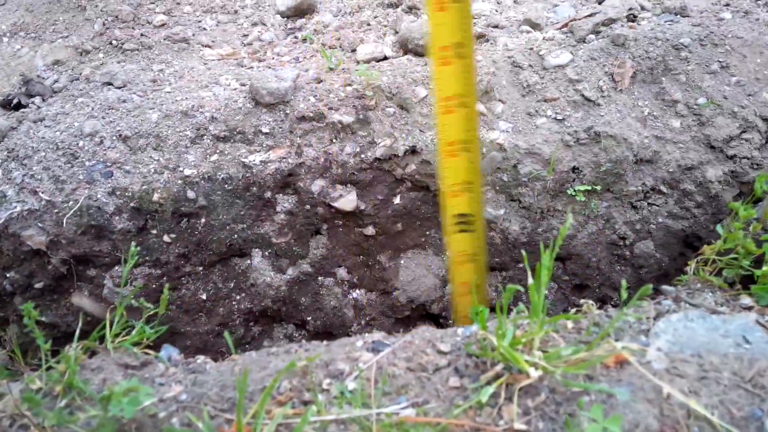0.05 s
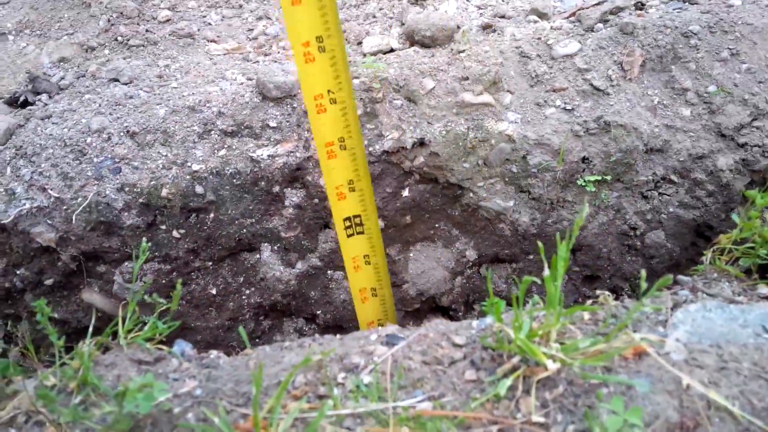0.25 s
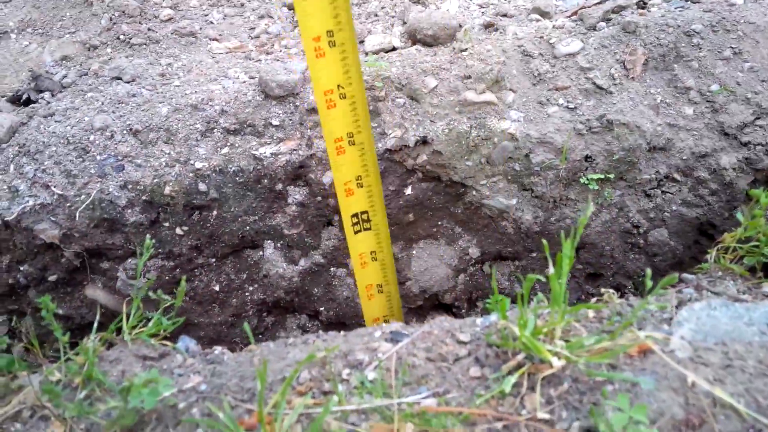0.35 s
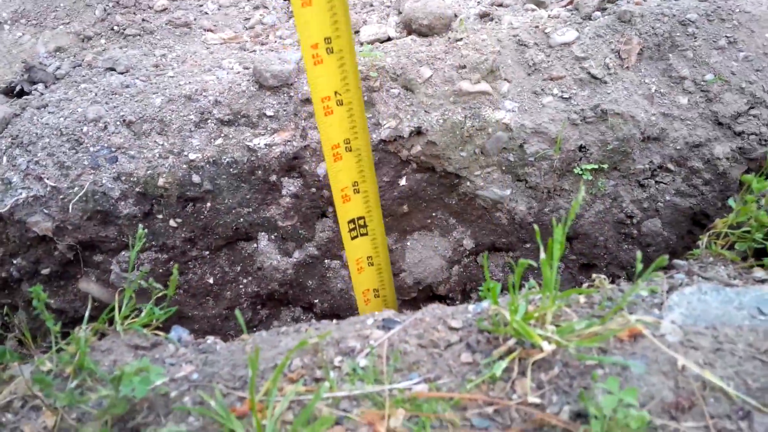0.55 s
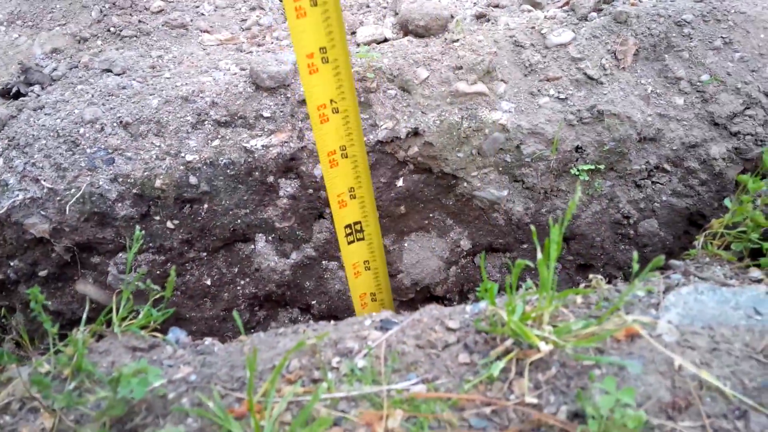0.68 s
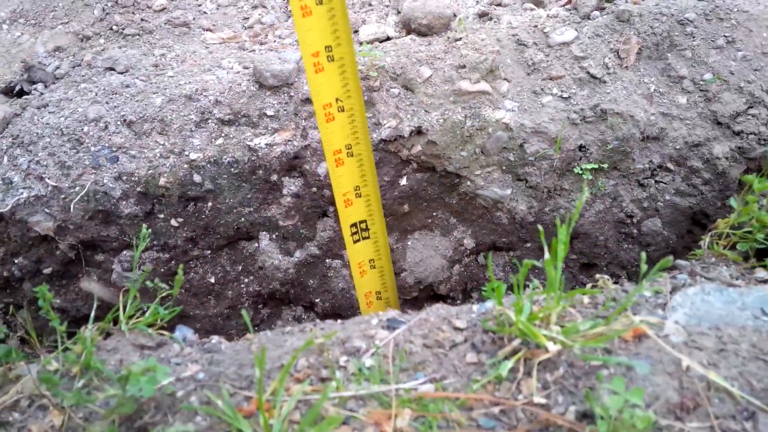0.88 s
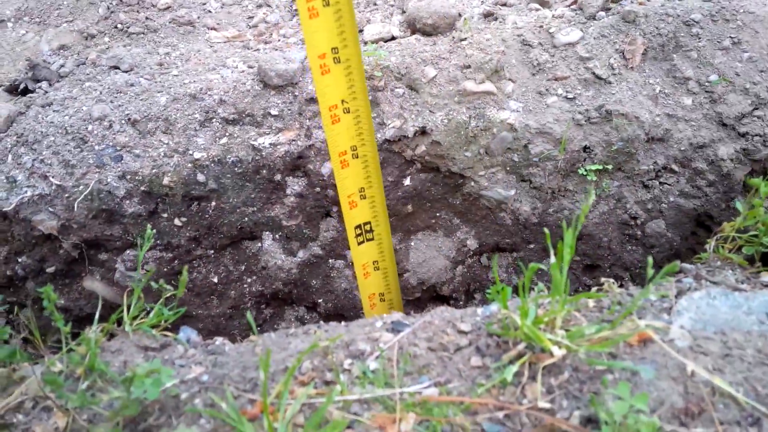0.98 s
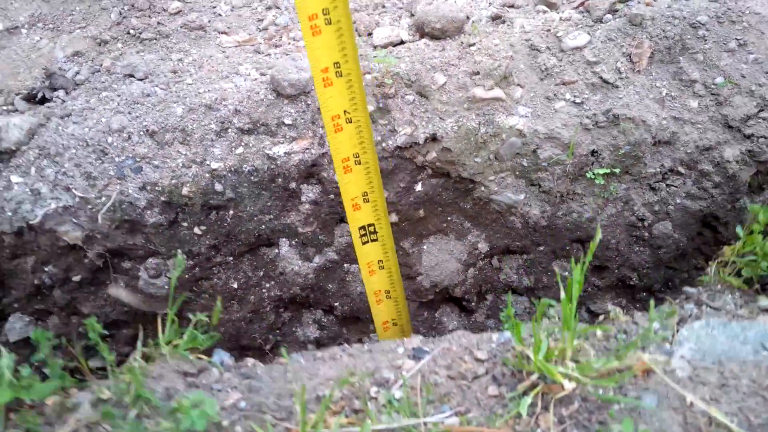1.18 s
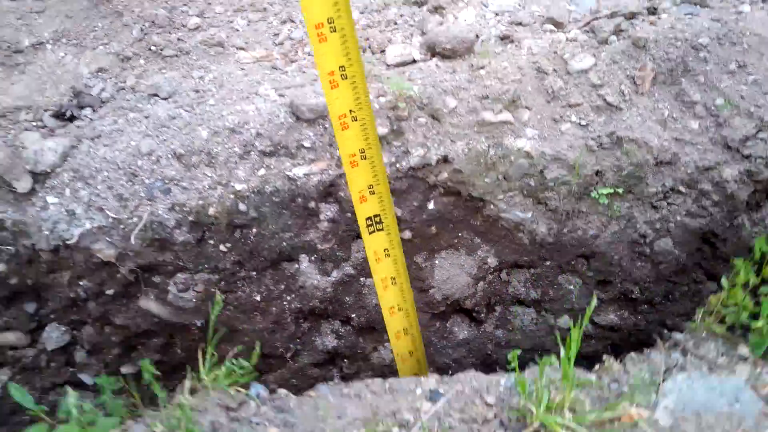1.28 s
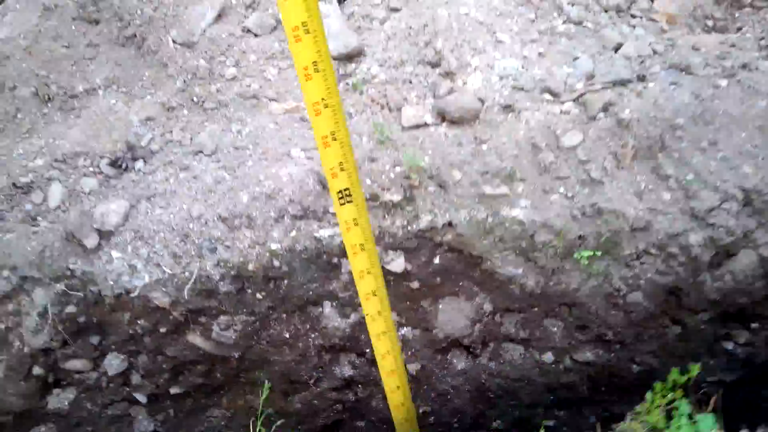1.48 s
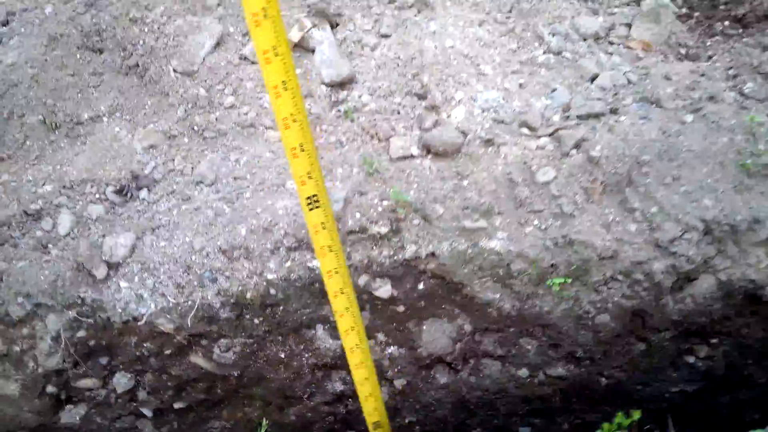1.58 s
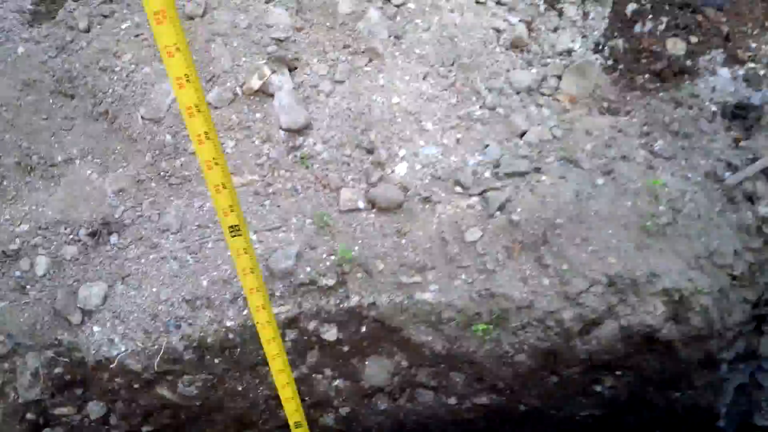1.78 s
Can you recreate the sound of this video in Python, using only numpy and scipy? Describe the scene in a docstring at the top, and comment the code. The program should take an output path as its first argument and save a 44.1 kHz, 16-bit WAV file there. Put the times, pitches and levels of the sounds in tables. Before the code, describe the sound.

A metal tape measure, close and slightly left, ticks against stones and buckles with a loud, bright clatter at about 0.2 seconds. Lighter scrapes follow, with a sharp click near 0.6. It rests from 0.8 to 1.2, when very faint distant chirps come through. Then it clicks and scrapes over gritty soil, ringing slightly and thinning out by 1.8. A low hum, handling rumble and soft outdoor air continue throughout.

```python
"""Tape measure in a dirt trench.

Close to the microphone and a little to the left, a steel tape measure is pushed down into a trench.
Its thin blade buckles with a loud clatter, ticks against stones, rests, then scrapes along the edge;
the hits and scrapes set the steel ringing. A low handling rumble at the microphone swells now and
then. Behind are a steady mains hum, a wash of open air and a faint far-off chirping."""
import sys
import numpy as np
from scipy import signal
from scipy.fft import rfft, irfft, next_fast_len
from scipy.io import wavfile
from scipy.ndimage import map_coordinates

SR = 44100
rng = np.random.default_rng(int(sys.argv[2]) if len(sys.argv) > 2 else 0)


def bounce(signal):
    """Save signal as a 16-bit WAV file at the path given by the first command-line argument."""
    frames = np.transpose(np.atleast_2d(signal))
    limited = np.clip(frames, -1, 1)
    pcm = np.round(limited * 32767).astype(np.int16)
    wavfile.write(sys.argv[1], SR, pcm)


N = 81585

# Mains hum. Each row: frequency in Hz, level in dB.
HUM_TONES = [(120, -44.5), (241, -70)]
# Spectra of the handling rumble, the drone around the hum, the open air, the blade's steel, a light
# tick's loss of lows, and rubbed soil. Each row: frequency in Hz, relative level in dB.
HANDLING_SPECTRUM = [(20, -3.5), (35, 0.5), (52, 4.5), (75, 6), (100, -8.5), (170, -29), (400, -67)]
DRONE_SPECTRUM = [(50, -16), (110, 1.5), (170, -1), (250, -4.5), (400, -11), (700, -21), (1500, -55)]
AIR_SPECTRUM = [(100, -19.5), (400, -4.5), (850, 0.5), (1400, -3.5), (2200, -12), (3800, -22),
                (5500, -28.5), (9000, -35.5), (15000, -50.5)]
STEEL_SPECTRUM = [(200, -25), (600, -32), (1000, -17.5), (1500, -22.5), (2200, -12), (3000, -7),
                  (4000, -0.5), (5500, -2), (7500, 2.5), (10000, 1.5), (13000, 0), (15800, -4.5)]
TICK_LOW_CUT = [(1200, -17), (3000, 3)]
SOIL_SPECTRUM = [(250, -12), (600, -1), (1200, -8), (1650, -2.5), (1780, 7.5), (1950, -7), (3300, -2),
                 (5000, -14), (9000, -34.5)]
# How handling rumble, air and soil rub rise and fall. Each row: time in seconds, level in dB.
HANDLING_LEVEL = [(0, -52.5), (0.4, -51), (1.0, -54.5), (1.25, -50), (1.6, -49.5), (1.85, -55.5)]
AIR_LEVEL = [(0, -59.5), (0.6, -61.5), (1.1, -61.5), (1.85, -59)]
SOIL_LEVEL = [(1.25, -76), (1.38, -72), (1.5, -53), (1.65, -56), (1.85, -57)]
# Tilts of a contact's spectrum. Each row: frequency in Hz, dB per unit of body or treble amount.
BODY_TILT = [(1200, 5.5), (2800, 3), (4800, 2.5), (7000, -0.5)]
TREBLE_TILT = [(9000, 3), (13000, 3.5)]
# The blade sliding on grit. Each row: start and length in seconds, mid-stroke level in dB,
# change along the stroke in dB, body amount, treble amount, singing pitch in Hz.
GRIT_SCRAPES = [(0.035, 0.014, -41.5, 14, 1.5, 12, 7600), (0.05, 0.037, -54.5, -2, 5.5, 11, 6360),
                (0.142, 0.024, -54.5, 6, 4, 26, 12400), (0.16, 0.029, -45.5, 8, 4, 5, 6300),
                (0.184, 0.021, -35, -9, 2, -5, 5400), (0.203, 0.053, -21.3, -1, 1.24, 4, 5500),
                (0.269, 0.019, -36.5, -9, 2, 0, 3730), (0.289, 0.1, -45.5, -15.5, 0.5, 3, 6560),
                (0.416, 0.038, -54, 10, -1, 9, 6100), (0.454, 0.023, -45, 5, 1, -3, 6950),
                (0.484, 0.13, -55, 16, -1, -9, 10900), (0.583, 0.063, -46.5, 12, 2.5, 7, 9600),
                (0.649, 0.074, -51.5, -6, 1, 7, 9400), (1.209, 0.048, -55.5, 2.5, 2, -3, 4030),
                (1.27, 0.0088, -45, 16, -0.5, 0, 6900), (1.282, 0.12, -46, -8, -0.5, 8, 7800),
                (1.334, 0.035, -39.5, -7, -2, -19, 6400), (1.37, 0.046, -42, -12, -1, -1, 6800),
                (1.408, 0.054, -38, -4.5, 1, 7, 6800), (1.461, 0.057, -36, -3.5, -0.5, -2, 6440),
                (1.526, 0.076, -37, -0.5, -0.5, 2, 15000), (1.614, 0.055, -52, -1, 2.5, -2, 5360),
                (1.675, 0.099, -59.5, -12, 3.5, -31, 6070), (1.791, 0.034, -54, 13, -0.5, -4, 7750)]
# The blade striking stones. Each row: start in seconds, level in dB, 60 dB decay time in seconds,
# body amount, treble amount, ping pitch in Hz.
STONE_TICKS = [(0.0448, -33.5, 0.02, -1, 0, 7300), (0.134, -49, 0.013, -4, 16, 12670),
               (0.1673, -32, 0.03, -4, 7, 6300), (0.183, -24.5, 0.052, 1.5, -3, 8700),
               (0.2028, -9.5, 0.037, -0.5, 4, 6940), (0.2127, -19, 0.064, 3, -1, 5040),
               (0.23, -14.5, 0.033, 0.5, -5, 8200), (0.2434, -20, 0.055, -3, 0, 8500),
               (0.290, -25, 0.011, -9, 0, 6860), (0.297, -32, 0.016, -19, 6, 6900),
               (0.3064, -34, 0.041, -6, 0, 9100), (0.325, -30, 0.011, -0.5, 3, 6940),
               (0.346, -39, 0.02, -1, 3, 6060), (0.364, -42.5, 0.037, 3, -2, 3900),
               (0.424, -45, 0.018, -9, 10, 10300), (0.4372, -42.5, 0.021, 0.5, 11, 6200),
               (0.4427, -44, .015, -4, 4, 9500), (0.4555, -34, .015, -0.5, 8, 10600),
               (0.4659, -36.5, 0.032, 1.5, 7, 3000), (0.538, -45, 0.016, -13, -3, 8500),
               (0.577, -25, 0.031, -13, 12.5, 10300), (0.6313, -15, 0.019, -1.5, 3.5, 4550),
               (0.6921, -28.5, 0.017, -2.5, -12, 6500), (0.7012, -28.5, 0.0069, -1.5, 2, 11130),
               (0.823, -64, 0.017, -4.5, -6, 7200), (1.2274, -26.5, 0.02, -4, -0.5, 10300),
               (1.2778, -31.5, 0.035, -5.5, 1, 6900), (1.2821, -13.5, 0.0084, -3, 2, 8100),
               (1.341, -35, 0.04, -3, 6, 6500), (1.3674, -26.5, 0.049, 0, 3, 7300),
               (1.3757, -27, 0.039, -0.5, 5, 6500), (1.4154, -30.5, 0.087, -0.5, 8, 8200),
               (1.4782, -28, 0.0097, -2, 0, 5670), (1.5006, -22, 0.011, -3.5, 5, 9700),
               (1.572, -27.5, 0.043, -1, -2, 7340), (1.5984, -22.5, 0.024, 0, 5, 9500),
               (1.651, -34.5, 0.016, -2, -4, 9400), (1.690, -46.5, .03, -4, -6, 9000),
               (1.7214, -44.5, 0.033, 3, -12, 3400), (1.8185, -40.5, 0.024, -2, 12, 9600),
               (1.8437, -35, 0.034, 1.5, 3, 9400)]
# The blade's resonances. Each row: frequency in Hz, relative level in dB.
BLADE_MODES = [(3967, -58), (4549, -60), (5146, -56), (5523, -56), (5938, -58), (6051, -60), (6175, -58),
               (7176, -58), (7558, -59), (8355, -55), (8592, -59), (8952, -59), (9313, -57), (9491, -58),
               (10675, -62), (10842, -59)]
# Its slow flexing modes. Each row: frequency and width in Hz, gain in dB.
FLEX_MODES = [(322, 10, 12), (885, 16, 11.5), (1745, 50, 7.5), (3306, 61, -1)]
# The edge's squeal, close by, and the chirps, far off.
# Each row: centre and half length in seconds, pitch in Hz, level in dB.
EDGE_SQUEAKS = [(0.137, .014, 4140, -57.5)]
FAR_CHIRPS = [(0.76, .04, 4050, -70.5), (0.816, 0.02, 3730, -64), (0.889, 0.023, 3570, -59),
              (0.917, 0.029, 3780, -64.5), (1.11, .03, 3784, -78)]
# Hits that ring the hooked end. Each row: start in seconds, level in dB, pitch ratio (higher when
# the end is pressed harder).
HOOK_HITS = [(0.6322, -34.5, 1.14), (1.2283, -40.5, 1.01), (1.2827, -39.5, 0.97), (1.3678, -42.5, 1.1),
             (1.4160, -40, 1.05), (1.4630, -44.5, 0.86), (1.5725, -42, 0.92), (1.5990, -42, 1)]
# The hook's modes. Each row: frequency in Hz, relative level in dB, 60 dB decay time in seconds.
HOOK_MODES = [(2591, -7.5, 0.024), (3530, 0, .035), (4036, -0.5, 0.041), (4920, -2, .045)]
# The hook leaving the soil. Each row: start in seconds, pitch in Hz, level in dB, decay in seconds.
HOOK_KNOCKS = [(1.201, 810, -42, 0.018)]
# The tape's lean at the microphone. Each row: frequency in Hz, left over right in dB.
LEFT_BIAS = [(400, 3.5), (1200, 4.5), (8000, 6), (13000, 4.5)]

TAPE_SPREAD = 0.27  # stereo side over mid
HOOK_ATTACK_S = 0.00052


def amp(db):
    """Decibels to gain."""
    return 10 ** (np.asarray(db) / 20)


def unit(x):
    """Scale to rms 1."""
    return x / np.sqrt(np.mean(x ** 2) + 1e-20)


def along(points, hz):
    """Interpolate (Hz, value) points on a log axis."""
    freqs, values = np.transpose(points)
    return np.interp(np.log(hz + 1), np.log(freqs + 1), values)


def level(rows):
    """Gain per sample from (s, dB) rows."""
    return amp(np.interp(np.arange(N) / SR, *np.transpose(rows)))


def bump(hz, centre_hz, width_hz):
    """A resonance's outline, 1 at its centre."""
    return 1 / (1 + ((hz - centre_hz) / width_hz) ** 2)


def filtered(x, response):
    """Pass x through a complex frequency response."""
    size = next_fast_len(N + SR // 2)
    return irfft(rfft(x, size) * response(np.fft.rfftfreq(size, 1 / SR)), size)[..., :N]


def noise(colour, spread, size=N):
    """Stereo noise of rms 1; colour gives dB for each frequency, spread is side over mid."""
    hz = np.fft.rfftfreq(size, 1 / SR)
    phases = np.exp(2j * np.pi * rng.random((2, len(hz))))
    mid, side = irfft(phases * amp(colour(hz)), size)
    return unit(np.array([mid + spread * side, mid - spread * side]))


def burst(sound, envelope):
    """Shape a sound by an envelope and give it that envelope's energy."""
    return unit(sound * envelope) * np.sqrt(np.mean(envelope ** 2))


def whistle(centre, half, pitch_hz, db, width):
    """A fuzzy tone that swells and fades; width is a share of its pitch."""
    band = lambda hz: 20 * np.log10(bump(hz, pitch_hz, width * pitch_hz))
    swell = np.exp(-((np.arange(N) / SR - centre) / half) ** 2 / 2)
    return amp(db) * swell * noise(band, spread=0.73)


def add(track, start, sound):
    """Mix a sound into the track at start seconds."""
    part = track[..., round(start * SR):][..., :sound.shape[-1]]
    part += sound[..., :part.shape[-1]]


def mains_hum():
    """Two steady tones in a bed of low noise, behind the trench."""
    t = np.arange(N) / SR
    tones = sum(np.sqrt(2) * amp(db) * np.sin(2 * np.pi * (hz * t + rng.random()))
                for hz, db in HUM_TONES)
    drone = amp(-55) * noise(lambda hz: along(DRONE_SPECTRUM, hz), spread=0.031)
    return tones + drone


def handling_rumble():
    """Handling makes a low rumble at the microphone, swelling now and then."""
    return level(HANDLING_LEVEL) * noise(lambda hz: along(HANDLING_SPECTRUM, hz), spread=0.03)


def open_air():
    """A soft wash of open air, drifting a little in level."""
    return level(AIR_LEVEL) * noise(lambda hz: along(AIR_SPECTRUM, hz), spread=0.2)


def steel(body, treble, size, emphasis, ripple_db=3, ripple_step_hz=219.4):
    """The blade's crowded bending waves; every contact point has peaks and dips of its own."""
    knots = rng.standard_normal(256)

    def colour(hz):
        tilt = body * along(BODY_TILT, hz) + treble * along(TREBLE_TILT, hz)
        ripple = ripple_db * map_coordinates(knots, [hz / ripple_step_hz], mode="mirror")
        return along(STEEL_SPECTRUM, hz) + tilt + ripple + emphasis(hz)
    return noise(colour, TAPE_SPREAD, size)


def scrapes(grains_per_s=700, grain_t60=0.0065, smooth_share=0.47, attack_s=0.0021, release_t60=0.052):
    """The sliding blade catches on hundreds of grains a second, and the rubbed stretch sings."""
    out, t = np.zeros((2, N)), np.arange(SR // 2) / SR
    grain_decay = amp(-60 / (grain_t60 * SR)) ** 2
    for start, length, db, change_db, body, treble, sing_hz in GRIT_SCRAPES:
        sing_db = lambda hz: 8 * bump(hz, sing_hz, width_hz=180)
        catches = rng.random(len(t)) < grains_per_s / SR
        power = signal.lfilter([1], [1, -grain_decay], catches.astype(float))
        grit = np.sqrt(smooth_share + (1 - smooth_share) * power / power.mean())
        stroke_db = db + change_db * (np.minimum(t / length, 1) - 0.5)
        release_db = -60 * np.maximum(t - length, 0) / release_t60
        envelope = amp(stroke_db + release_db) * (1 - np.exp(-t / attack_s))
        add(out, start, steel(body, treble, len(t), sing_db) * grit * envelope)
    return out


def ticks(attack_s=0.000066):
    """A stone pings a short stretch of steel; so light a hit hardly bends the blade and has few lows."""
    out, t = np.zeros((2, N)), np.arange(SR // 20) / SR
    for start, db, t60, body, treble, ping_hz in STONE_TICKS:
        ping_db = lambda hz: along(TICK_LOW_CUT, hz) + 7 * bump(hz, ping_hz, width_hz=390)
        envelope = amp(db - 60 * t / t60) * (1 - np.exp(-t / attack_s))
        add(out, start, burst(steel(body, treble, len(t), ping_db), envelope))
    return out


def blade_ring(contacts, direct_db=-1, ring_db=2, width_hz=38, shimmer_db=-15.5, shimmer_t60=0.168):
    """Contacts ring the blade's resonances and leave a shimmer of countless weaker ones."""
    strongest_db = max(db for hz, db in BLADE_MODES)
    modes = [(hz, width_hz, db - strongest_db + ring_db) for hz, db in BLADE_MODES] + FLEX_MODES
    ring = lambda hz: sum(amp(db) * 1j * hz * width / (centre ** 2 - hz ** 2 + 1j * hz * width)
                          for centre, width, db in modes)
    t = np.arange(SR // 2) / SR
    tail = noise(np.zeros_like, spread=0.7, size=len(t)) * amp(-60 * t / shimmer_t60)
    shimmer = signal.fftconvolve(contacts, tail / np.linalg.norm(tail[0]), axes=1)[:, :N]
    return filtered(contacts, lambda hz: amp(direct_db) + ring(hz)) + amp(shimmer_db) * shimmer


def edge_squeak():
    """The edge squeals briefly, with a third harmonic at its height."""
    return sum(whistle(centre, half, hz, db, width=0.054)
               + whistle(centre, half / 4, 3 * hz, db + 2, width=0.028)
               for centre, half, hz, db in EDGE_SQUEAKS)


def hook_rings():
    """The hooked end rings on at a few clear pitches after a hit."""
    out, t = np.zeros(N), np.arange(SR // 8) / SR
    for start, db, ratio in HOOK_HITS:
        ring = sum(amp(mode_db - 60 * t / t60) * np.sin(2 * np.pi * (ratio * hz * t + rng.random()))
                   for hz, mode_db, t60 in HOOK_MODES)
        add(out, start, amp(db) * ring * (1 - np.exp(-t / HOOK_ATTACK_S)))
    return out


def far_chirps():
    """Faint chirps a long way off, heard while the blade rests."""
    return sum(whistle(*row, width=0.07) for row in FAR_CHIRPS)


def hook_knock():
    """A small, dull knock as the hook lifts out of the soil."""
    out, t = np.zeros((2, N)), np.arange(SR // 10) / SR
    for start, pitch_hz, db, t60 in HOOK_KNOCKS:
        band = lambda hz: 40 * np.log10(bump(hz, pitch_hz, width_hz=260))
        envelope = amp(db - 60 * t / t60) * (1 - np.exp(-t / HOOK_ATTACK_S)) ** 2
        add(out, start, burst(noise(band, TAPE_SPREAD, len(t)), envelope))
    return out


def soil_rub():
    """The blade drags dully over loose soil."""
    return level(SOIL_LEVEL) * noise(lambda hz: along(SOIL_SPECTRUM, hz), spread=0.23)


def place_left(sound, lead_s=0.000012):
    """Sound reaches the microphone's left side louder and a little earlier."""
    sides = np.array([[1], [-1]])

    def response(hz):
        gains = amp(sides * along(LEFT_BIAS, hz) / 2)
        return gains / gains.mean(axis=0) * np.exp(1j * np.pi * hz * lead_s * sides)
    return filtered(sound, response)


def scene():
    """The tape measure, close and to the left, over hum, handling rumble, air and chirps."""
    tape = blade_ring(ticks() + scrapes()) + hook_rings() + edge_squeak() + soil_rub() + hook_knock()
    return place_left(tape) + mains_hum() + handling_rumble() + open_air() + far_chirps()


def record(dry, top_hz=15790):
    """The recorder keeps nothing above its band limit."""
    return filtered(dry, lambda hz: 1 / np.sqrt(1 + (hz / top_hz) ** 500))


dry = scene()
out = record(dry)
bounce(out)
```